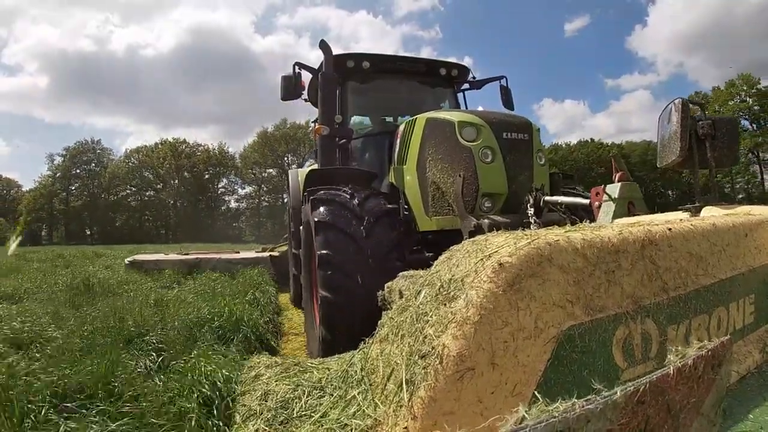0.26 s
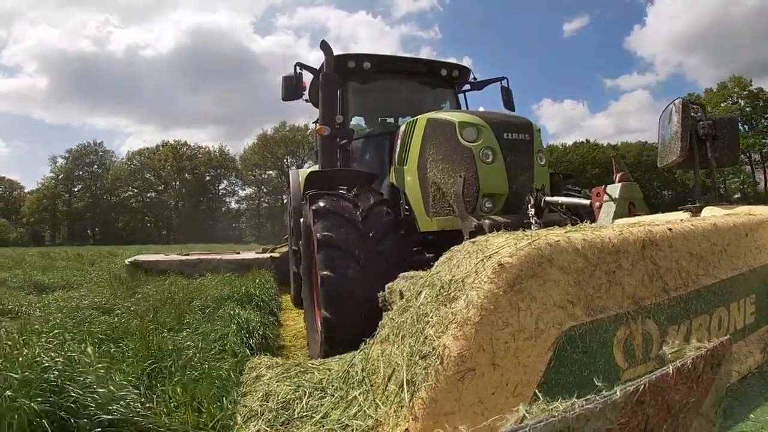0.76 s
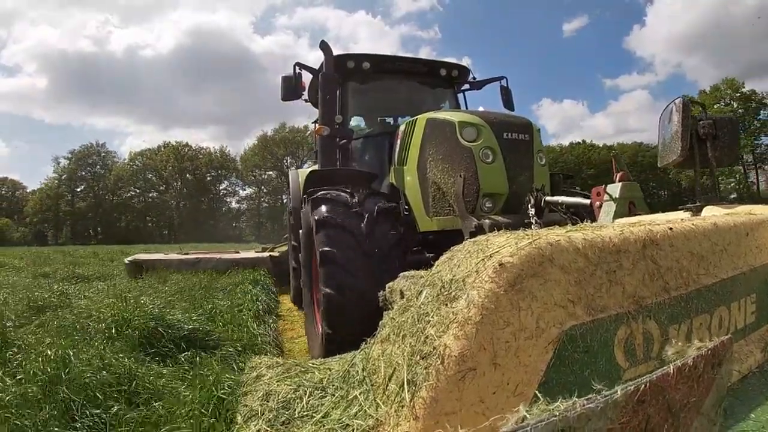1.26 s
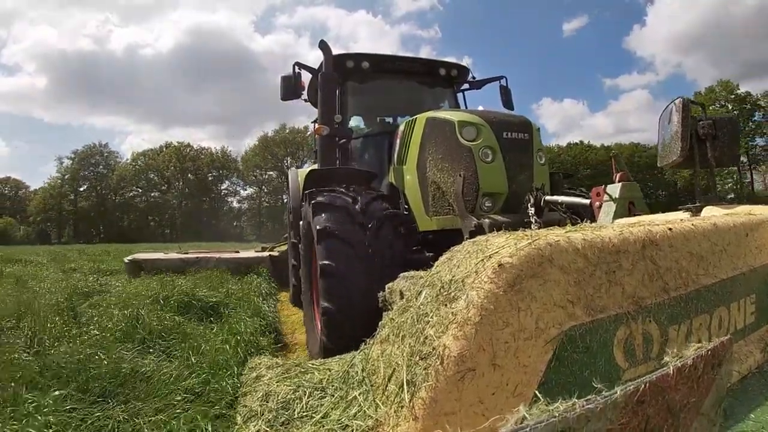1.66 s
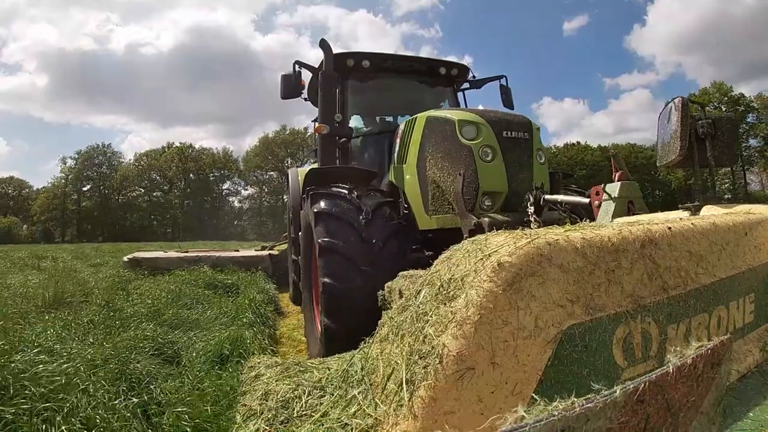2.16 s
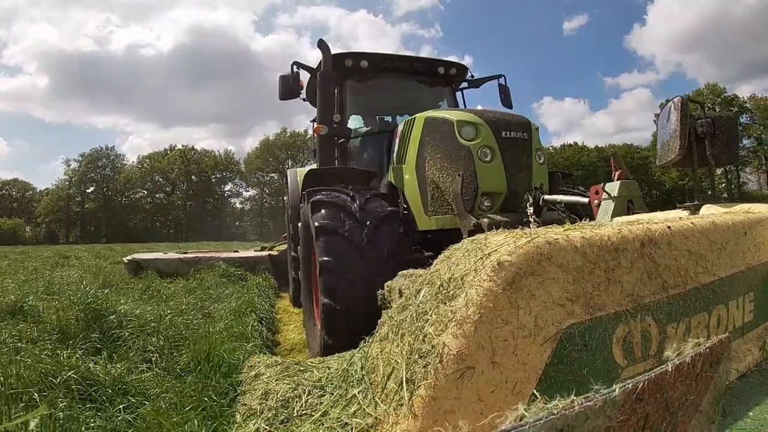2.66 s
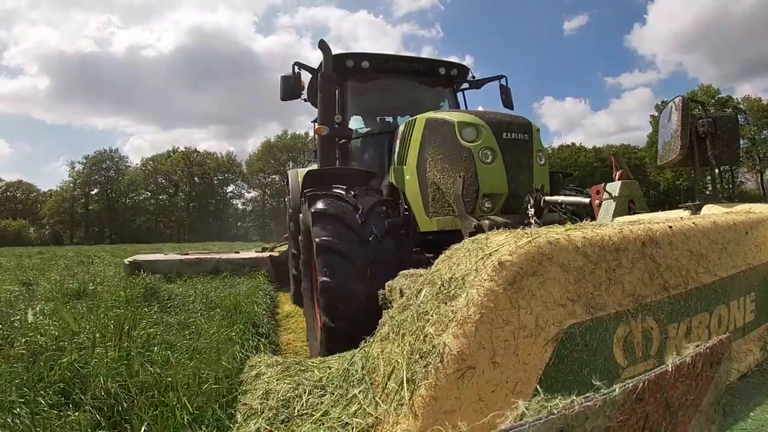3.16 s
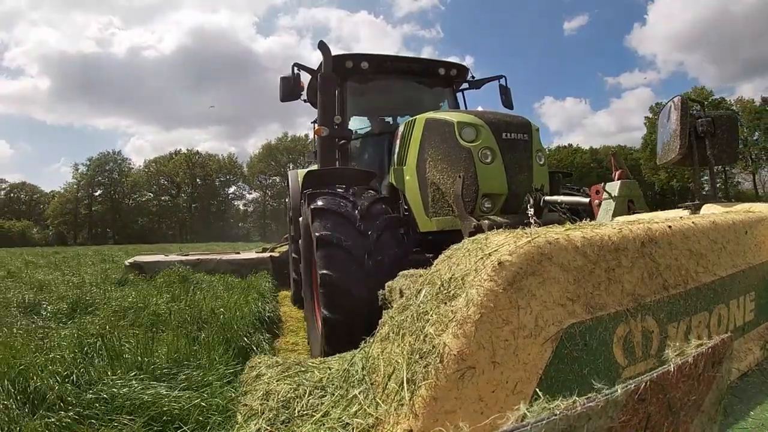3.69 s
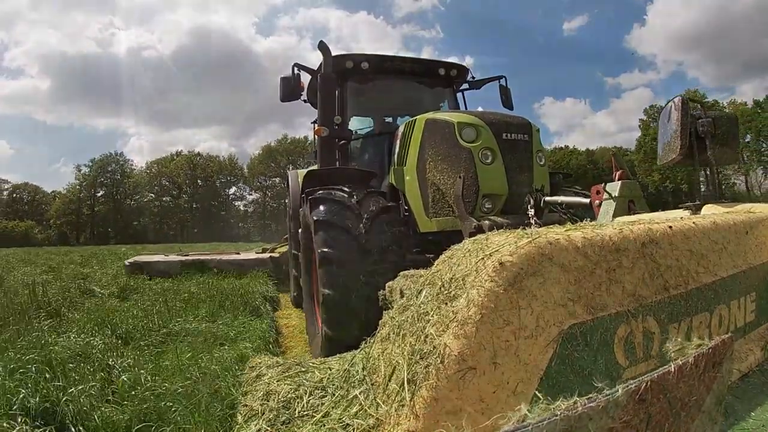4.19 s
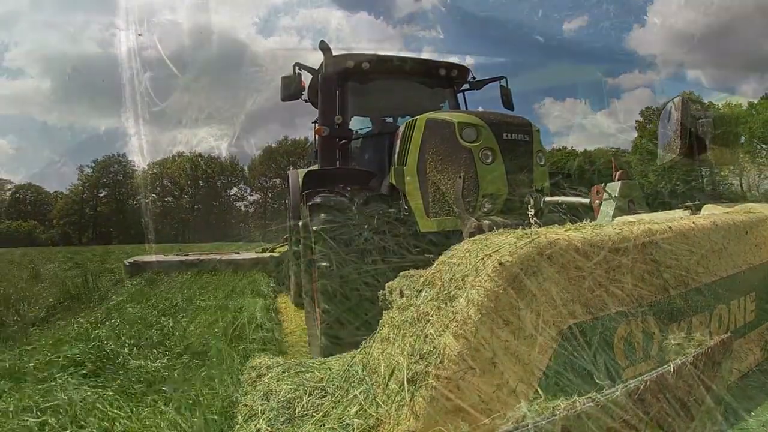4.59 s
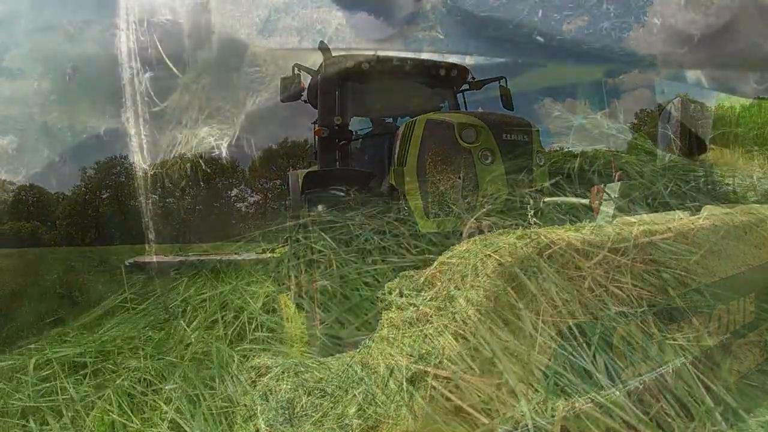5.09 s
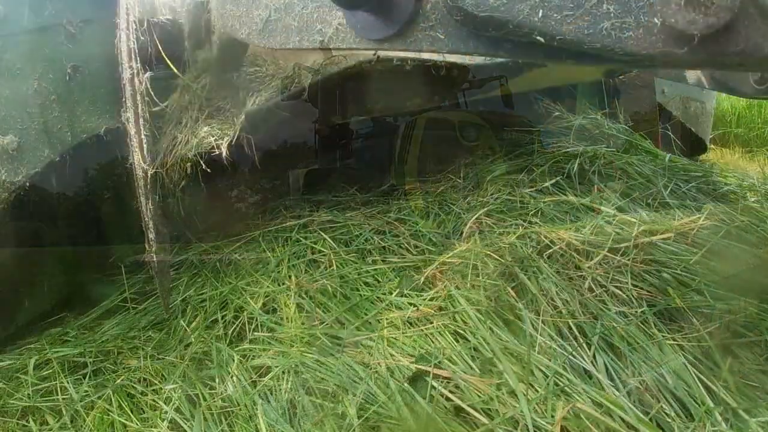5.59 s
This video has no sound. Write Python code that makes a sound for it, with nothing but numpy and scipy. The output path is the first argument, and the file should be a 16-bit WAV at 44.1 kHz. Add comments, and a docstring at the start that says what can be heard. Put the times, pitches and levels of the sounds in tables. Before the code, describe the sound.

A muffled, cased microphone rides on a tractor's front mower in a grass field. From 0 s, a powerful hum near 104 Hz dominates, throbbing about three times a second as front and rear discs drift in and out of step. Around it sit a steady diesel drone, boomy covers, roaring air, beating tine rotors and a whine near 520 Hz. Cut grass hisses and crackles throughout, with brief tearing rasps near 0.1, 1.1, 2.0, 2.2 and 3.3 s. The hum dips sharply near 0.8 s and lurches around 3.1 to 3.4 s. A faint under-hood swish is present all along; it grows from about 4 s, equals the outside sound near 5 s and takes over by 5.6 s. There, roughly 27 rotor strokes a second fling crop against hollow, ringing steel with low rumbling, while the deep hum weakens and the engine, whine and cutting disappear by the end at 5.8 s.

```python
"""A deep, throbbing hum of mower discs comes first, with a diesel drone and the hiss of cut grass.
A tractor drives front and rear disc mowers, heard from the front one; two conditioner rotors beat together.
Steady tones follow the turning parts; shaped noise and random clicks make the air, the grass and the steel.
A little sound from under the hood is there throughout; near the end it takes over, and a rotor beats the crop."""
import sys
import numpy as np
from scipy import signal
from scipy.fft import rfft, irfft
from scipy.io import wavfile
from scipy.ndimage import uniform_filter1d, minimum_filter1d

SR = 44100
rng = np.random.default_rng(int(sys.argv[2]) if len(sys.argv) > 2 else 0)


def output_pcm(signal):
    """Save a mono or channel-first signal as 16-bit PCM at the path in sys.argv[1].

    Samples are clipped to [-1, 1] before scaling.
    """
    pcm = np.clip(np.atleast_2d(signal).T, -1, 1) * 32767
    wavfile.write(sys.argv[1], SR, np.round(pcm).astype(np.int16))


N = 257544
TIME = np.arange(N) / SR
BINS = np.fft.rfftfreq(N, 1 / SR)  # frequencies of the spectrum (Hz)

# Steady boom of the covers: f/Hz, relative level/dB
COVER_SPECTRUM = [(60, -44), (110, -27), (135, -4), (160, 3.5), (182, -5), (200, -5), (218, -3.5),
                  (240, -12), (300, -21.5), (600, -37.5), (3000, -69.5)]
# Air churned by the discs: f/Hz, relative level/dB
ROAR_SPECTRUM = [(10, -20), (25, -2.5), (50, -12), (85, 6), (130, 4), (240, -10), (350, -4), (450, -4.5),
                 (560, -2), (700, -5.5), (950, -14.5), (1300, -16.5), (2500, -19.5), (6000, -38)]
# Speed of the engine: t/s, firings per second/Hz
FIRING_RATE = [(0, 100.3), (.3, 100.45), (.75, 100.15), (1.1, 100.45), (1.6, 100.2), (1.85, 100.45),
               (2.45, 100.55), (2.75, 100.2), (3.1, 100.4), (3.55, 100.9), (4.1, 100.55), (4.7, 100.05),
               (5.84, 99.9)]
# Engine tones: multiple of the firing rate, level/dB
ENGINE_TONES = [(1, -32), (3, -28.5), (4.5, -66), (6, -28.5), (7.5, -65), (9, -39), (9.5, -42.5), (12, -43),
                (15, -39), (15.5, -44), (16.5, -43), (38, -48), (49.5, -50)]
# Conditioner tones: multiple of the tine rate, front rotor level/dB, rear rotor level/dB
ROTOR_TONES = [(1, -25, -31), (2, -39.5, -41.5), (3, -34, -36), (4, -36, -37.5)]
# Share of the sound that comes from under the hood: t/s, share/0-1
HOOD_SHARE = [(3.7, 0.16), (4.1, 0.2), (4.5, 0.27), (4.8, 0.43), (5.05, 0.6), (5.3, 0.75), (5.6, 0.96),
              (5.84, 1)]
# Force of the crop rotor's four bars, in turn: force/dB
BAR_FORCE = [1.5, 0, -.3, -1.5]
# Crop swishing against the hood: f/Hz, relative level/dB
SWISH_SPECTRUM = [(200, -13), (400, -22), (500, 3), (800, 0.5), (1100, -5), (1300, -6), (1550, -6),
                  (2000, -6.5), (2850, -8), (3100, -13), (3800, -13.5), (4300, -21.5), (6000, -30),
                  (15000, -33)]
# Fine bits sprayed under the hood: f/Hz, relative level/dB
SPRAY_SPECTRUM = [(1500, -18), (3500, -1.5), (6000, 0), (8000, 4), (10000, -5), (15000, -10)]
# Hollow ring of the steel hood: f/Hz, width/Hz, relative level/dB
STEEL_MODES = [(466, 51, 0.5), (494, 35, 2.5), (755, 51, -3), (850, 50, -1), (1068, 32, -3.5),
               (1123, 91, -12), (1432, 16, -8), (1583, 47, -5), (1830, 76, -11), (2127, 40, -6.5),
               (2750, 50, -9.5)]
# Rumble of the hood panels: f/Hz, relative level/dB
RUMBLE_SPECTRUM = [(10, -36), (30, -7), (60, 3), (82, 5), (112, 8), (145, -16), (203, -3), (240, -11.5),
                   (370, -16), (470, -7), (700, -28), (950, -16), (1500, -21), (6000, -46)]
# How much grass is fed in, as cutting hiss before the STALKS_DB offset: t/s, level/dB
GRASS_FEED = [(0.0, -27), (0.7, -27.5), (1.0, -24), (1.7, -26), (2.15, -23), (2.7, -26.5), (3.35, -23.5),
              (3.7, -25.5), (3.9, -24.5), (4.4, -27), (4.8, -27.5)]
# Crackle of the stalks: f/Hz, relative level/dB
STALK_SPECTRUM = [(300, -23), (800, -2), (1100, 4), (1350, -3), (1520, -0.5), (1660, 1.5), (1800, 0),
                  (2150, 1), (2400, -1.5), (3100, 0.5), (4100, -6.5), (6000, -11), (15000, -24.5)]
# Sizzle of the leaves: f/Hz, relative level/dB
LEAF_SPECTRUM = [(1000, -14), (2500, -8.5), (4000, 1), (6000, 3.5), (15000, -6.5)]
# Thick tufts tearing through the blades: t/s, length/s, level/dB
TORN_TUFTS = [(0.095, 0.026, -30), (1.057, .025, -32), (2.036, 0.0098, -26.5), (2.204, 0.028, -27),
              (2.644, .015, -36), (3.343, 0.024, -31), (3.847, 0.024, -37)]
# Rasp of the tearing tufts: f/Hz, relative level/dB
TEAR_SPECTRUM = [(500, -22), (1200, -3), (2400, 0), (3400, -2), (4500, -12.5), (8000, -27)]
# Speed of the front discs: t/s, blade passes per second/Hz
BLADE_RATE = [(0, 104.6), (.3, 104.2), (.75, 103.75), (1.1, 103.95), (1.45, 103.85), (1.9, 104.15),
              (2.45, 104.2), (2.8, 103.85), (3.15, 104.2), (3.65, 104.7), (4.2, 104.15), (4.6, 103.25),
              (5, 103.85), (5.84, 103.7)]
# Whine of the discs, before the whine_db offset: t/s, level/dB
WHINE_LEVEL = [(0.0, -23.5), (0.75, -22.5), (1.4, -20.5), (1.62, -23), (2.3, -24.0), (3.6, -25.5),
               (4.0, -23), (4.5, -26)]
# Weaker disc overtones: multiple of the blade-pass rate, level/dB
DISC_TONES = [(.5, -36.5), (1.5, -36), (2, -32.5), (3, -36), (4, -35.5), (7, -42.5), (8, -45.5), (10, -42),
              (11, -44.5), (21, -44.5)]
# Blade hum, before the front and rear offsets: t/s, level/dB
HUM_LEVEL = [(0.0, -10.5), (0.7, -16), (0.82, -24), (0.94, -14.5), (1.65, -11), (2.1, -14.5), (2.98, -11.0),
             (3.07, -19), (3.22, -7.5), (3.33, -23.5), (3.45, -12.5), (4.0, -10), (4.2, -15.0), (4.85, -15),
             (5.35, -26.0), (5.84, -27)]
# Microphone in its closed case: f/Hz, gain/dB
CASE_RESPONSE = [(6000, 1), (6400, -9), (6900, -17), (7600, -20.5), (9000, -14.5), (9600, -18),
                 (10800, -17), (11800, -25), (13300, -29), (14500, -50.5)]

# Covers: boom level before the hood's change, and depth of its swaying (dB)
BOOM_DB, BOOM_SWAY_DB = -25, 1.44
# Octave drone: engine's part, rear discs' part, change when fully under the hood (dB)
DRONE_DB, REAR_OCTAVE_DB, HOOD_DRONE_DB = -29.5, -28, -6
# Depth (share) and rate (Hz) of the drone's flutter
DRONE_FLUTTER, DRONE_FLUTTER_HZ = .5, 9
# Depth of the random flutter on the other tones (share)
WHINE_FLUTTER, OVERTONE_FLUTTER, ENGINE_FLUTTER = .1, .33, .4
# Front and rear rotors: tine passes per blade pass, and a moment when the two are near step (s)
ROTOR_GEARING, ROTORS_IN_STEP_S = (.6092, .6535), 2.43
# Crop rotor: bar rate (Hz), and a moment when a stroke of the first listed bar begins (s)
BARS_PER_S, BAR_START_S = 26.75, 5.293
# Crop flow between strokes, and steady sliding on the steel (shares of a full stroke)
LULL, SLIDING = .22, 2.4
# Hood spray: level (dB), sharpness of its strokes (power); flicker of the hood crop (dB)
SPRAY_DB, SPRAY_POWER, CROP_FLICKER_DB = -42, 2.0, .7
# Cutting: stalks relative to the feed, flicker of the feed, sizzle of the leaves (dB)
STALKS_DB, FEED_FLICKER_DB, SIZZLE_DB = -4.6, 1.05, -35
# Depth of the hiss's spurts at each blade pass, and at twice that rate (share)
SPURT, DOUBLE_SPURT = .12, .08
# Rear discs: lag behind the front ones (passes per second), a moment when both are in step (s)
REAR_LAG_HZ, DISCS_IN_STEP_S = 3.0, 2.277
# Front and rear hum relative to HUM_LEVEL, flicker of the front hum, sway of the whine (dB)
FRONT_DB, REAR_DB, HUM_FLICKER_DB, WHINE_SWAY_DB = -4.3, -21.5, .7, 1.0
# Fade at both ends (s), upper band limit (Hz)
FADE_S, EDGE_HZ = .0005, 14500


def gain_of(db):
    """Turns decibels into an amplitude."""
    return 10 ** (np.asarray(db) / 20)


def evened(x):
    """Scales a sound to an average (rms) strength of 1."""
    return x / np.sqrt(np.mean(x ** 2) + 1e-20)


def curve(rows):
    """Draws straight lines between table points, giving a value at every sample."""
    return np.interp(TIME, *np.transpose(rows))


def coloured(x, spectrum):
    """Filters by a spectrum drawn on a log-frequency axis."""
    hz, db = np.transpose(spectrum)
    gain = gain_of(np.interp(np.log(BINS + 1), np.log(hz), db))
    return irfft(rfft(x) * gain, N)


def noise(spectrum):
    """Makes noise of rms 1 with the given spectrum."""
    return evened(coloured(rng.standard_normal(N), spectrum))


def wander(rate_hz):
    """Drifts smoothly at random with rms 1, with little movement above the given rate."""
    frames = N // 64 + 2  # one value per 64 samples is enough for slow movement
    hz = np.fft.rfftfreq(frames, 64 / SR)
    smoothing = np.exp(-(hz / rate_hz) ** 2) * (hz > 0)
    slow = irfft(rfft(rng.standard_normal(frames)) * smoothing, frames)
    return np.interp(np.arange(N) / 64, np.arange(frames), evened(slow))


def turns_of(speed):
    """Adds up the cycles gone by at a changing speed."""
    return np.cumsum(curve(speed)) / SR


def rear_of(turns):
    """Counts blade passes of the rear mower, which falls steadily behind the front one."""
    return turns - REAR_LAG_HZ * (TIME - DISCS_IN_STEP_S)


def partial(turns, multiple, flutter, flutter_hz):
    """Makes one tone of a turning shaft, rms 1, fluttering in level and phase."""
    angle = 2 * np.pi * (multiple * turns + rng.random())
    level_part = (1 + flutter * wander(flutter_hz)) * np.cos(angle)
    phase_part = flutter * wander(flutter_hz) * np.sin(angle)
    return evened(level_part + phase_part)


def snaps(per_s, spread_db):
    """Breaks stalks as random clicks, a few much larger than the rest."""
    size = gain_of(spread_db * np.minimum(rng.exponential(1, N), 5))
    happens = rng.random(N) < per_s / SR
    return evened(size * rng.choice([-1, 1], N) * happens)


def covers(inside, hood_db=-8):
    """The covers boom as low noise that sways slowly, and is quieter under the hood."""
    return gain_of(BOOM_DB + BOOM_SWAY_DB * wander(2) + hood_db * inside) * noise(COVER_SPECTRUM)


def roar(turns):
    """Air churned by the discs roars, pulsing with the blades."""
    pulsing = 1 + 0.31 * np.cos(2 * np.pi * turns)
    return gain_of(-21.5 + 0.2 * wander(18)) * pulsing * noise(ROAR_SPECTRUM)


def engine():
    """The diesel sounds at multiples of its firing rate; the higher tones flutter faster."""
    turns = turns_of(FIRING_RATE)
    out = np.zeros(N)
    for multiple, db in ENGINE_TONES:
        out += gain_of(db) * partial(turns, multiple, ENGINE_FLUTTER, flutter_hz=8 + multiple)
    return out


def drone(turns, inside):
    """The octaves of the engine and of the rear discs lie close, so their drone swells and fades."""
    firing = partial(turns_of(FIRING_RATE), 2, DRONE_FLUTTER, DRONE_FLUTTER_HZ)
    blades = partial(rear_of(turns), 2, DRONE_FLUTTER, DRONE_FLUTTER_HZ)
    together = gain_of(DRONE_DB) * firing + gain_of(REAR_OCTAVE_DB) * blades
    return gain_of(HOOD_DRONE_DB * inside) * together


def conditioners(turns):
    """Two tine rotors, geared a little differently to the discs, beat against each other."""
    turns = turns - np.interp(ROTORS_IN_STEP_S, TIME, turns)
    out = np.zeros(N)
    for multiple, *levels in ROTOR_TONES:
        for gearing, db in zip(ROTOR_GEARING, levels):
            angle = 2 * np.pi * multiple * gearing * turns + 0.1 * multiple * wander(4.5)
            out += gain_of(db + 2.0 * wander(2.3)) * evened(np.cos(angle))
    return out


def under_hood(rise=0.25, fall=0.78):
    """Each rotor bar throws a swish of crop against the steel hood and shakes it."""
    bars = (TIME - BAR_START_S) * BARS_PER_S
    age = bars % 1  # share of the stroke gone by; rise and fall are in the same unit
    bar = np.floor(bars).astype(int) % len(BAR_FORCE)
    dying = np.exp(-(np.maximum(age - rise, 0) / fall) ** 2)
    swish = gain_of(BAR_FORCE)[bar] * np.minimum(age / rise, 1) * dying

    bits = rng.standard_normal(N) + .5 * snaps(per_s=1600, spread_db=4.5)
    crop = gain_of(CROP_FLICKER_DB * wander(40)) * bits
    swishes = gain_of(-27.5) * evened(coloured(crop * (LULL + swish), SWISH_SPECTRUM))
    # the spray of fine bits comes only with the stroke itself
    spray = gain_of(SPRAY_DB) * evened(coloured(swish ** SPRAY_POWER * crop, SPRAY_SPECTRUM))

    # crop keeps sliding along the steel between strokes
    steel = sum(gain_of(db) / np.sqrt(width) / (1 + 2j * (BINS - hz) / width)
                for hz, width, db in STEEL_MODES)
    ring = gain_of(-27.0) * evened(irfft(rfft(crop * (SLIDING + swish)) * steel, N))
    # the panels throb at three times the bar rate and rumble hardest on each stroke
    throb = gain_of(-32.5) * partial(bars, 3, flutter=.12, flutter_hz=6)
    rumble = gain_of(-28.5) * evened((1.0 + swish) * noise(RUMBLE_SPECTRUM))
    return swishes + spray + ring + throb + rumble


def cutting(turns):
    """Stalks crackle with the feed and leaves sizzle, in spurts at each blade pass; tufts tear with a rasp."""
    spurts = 1 + SPURT * np.cos(2 * np.pi * turns) + DOUBLE_SPURT * np.cos(4 * np.pi * turns)
    breaks = rng.standard_normal(N) + 0.69 * snaps(per_s=2500, spread_db=3.0)
    stalk_gain = gain_of(curve(GRASS_FEED) + STALKS_DB + FEED_FLICKER_DB * wander(49))
    stalks = stalk_gain * evened(coloured(breaks * spurts, STALK_SPECTRUM))

    leaves = rng.standard_normal(N) + 0.64 * snaps(per_s=1200, spread_db=2.5)
    sizzle_gain = gain_of(SIZZLE_DB + .5 * wander(30))
    sizzle = sizzle_gain * evened(coloured(leaves * spurts, LEAF_SPECTRUM))

    tufts = sum(gain_of(db) * np.exp(-((TIME - s) / length) ** 2) for s, length, db in TORN_TUFTS)
    return stalks + sizzle + tufts * spurts * noise(TEAR_SPECTRUM)


def discs(turns, whine_db=-1.0):
    """The discs whine at five times the blade-pass rate, among weaker overtones."""
    whine_gain = gain_of(curve(WHINE_LEVEL) + whine_db + WHINE_SWAY_DB * wander(4))
    out = whine_gain * partial(turns, 5, WHINE_FLUTTER, flutter_hz=9.4)
    for multiple, db in DISC_TONES:
        out += gain_of(db) * partial(turns, multiple, OVERTONE_FLUTTER, flutter_hz=7.1)
    return out


def blade_hum(turns):
    """Blades chop the air in a deep hum; the slightly slower rear mower makes it throb."""
    front_gain = gain_of(FRONT_DB + HUM_FLICKER_DB * wander(14))
    front = front_gain * evened(np.cos(2 * np.pi * turns))
    rear_gain = gain_of(REAR_DB + 0.64 * wander(3))
    rear = rear_gain * evened(np.cos(2 * np.pi * rear_of(turns)))
    return gain_of(curve(HUM_LEVEL)) * (front + rear)


def scene(hiss_fade=1.01, hood_rise=1.14):
    """The open-air sound gives way to the sound under the hood; hum, drone and boom carry to both."""
    turns = turns_of(BLADE_RATE)
    inside = np.clip(curve(HOOD_SHARE), 0, 1)
    machines = roar(turns) + engine() + conditioners(turns) + discs(turns)
    outside = (1 - inside) * machines + (1 - inside) ** hiss_fade * cutting(turns)
    both_places = covers(inside) + drone(turns, inside) + blade_hum(turns)
    return (both_places + outside + inside ** hood_rise * under_hood())[None]


def record(dry):
    """The case dulls the treble, a limiter turns down the highest crests, and a filter cuts the top."""
    ends = np.minimum(np.minimum(TIME, TIME[::-1]) / FADE_S, 1)
    muffled = coloured(ends * dry[0], CASE_RESPONSE)
    headroom = np.minimum(gain_of(-2.6) / (abs(muffled) + 1e-9), 1)
    # hold the lowest gain around each crest, then smooth it (windows in samples)
    limited = muffled * uniform_filter1d(minimum_filter1d(headroom, size=500), size=500)
    low_pass = signal.firwin(511, EDGE_HZ, window=("kaiser", 9), fs=SR)
    return signal.oaconvolve(limited, low_pass, "same")[None]


dry = scene()
out = record(dry)
output_pcm(out)
```